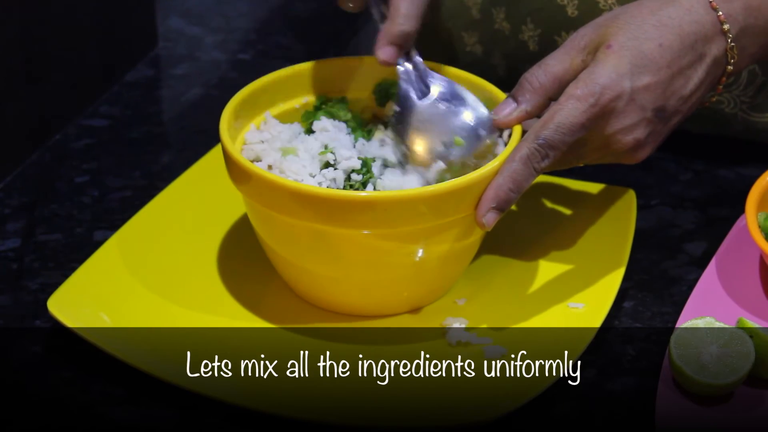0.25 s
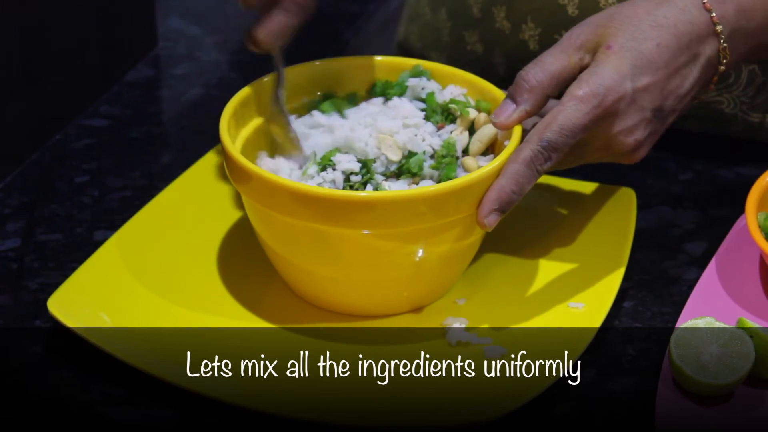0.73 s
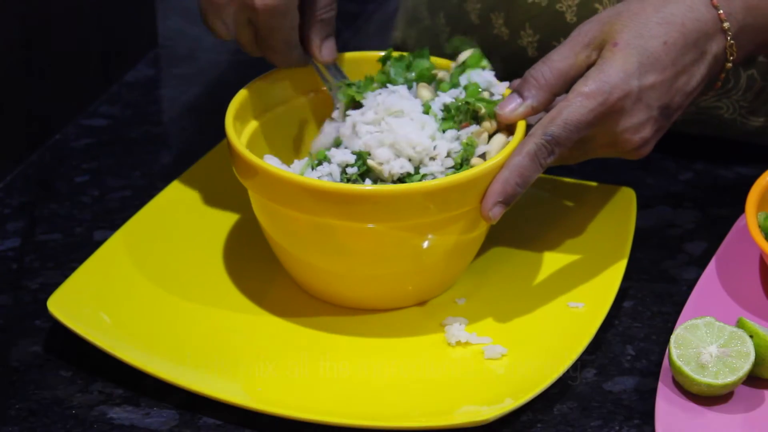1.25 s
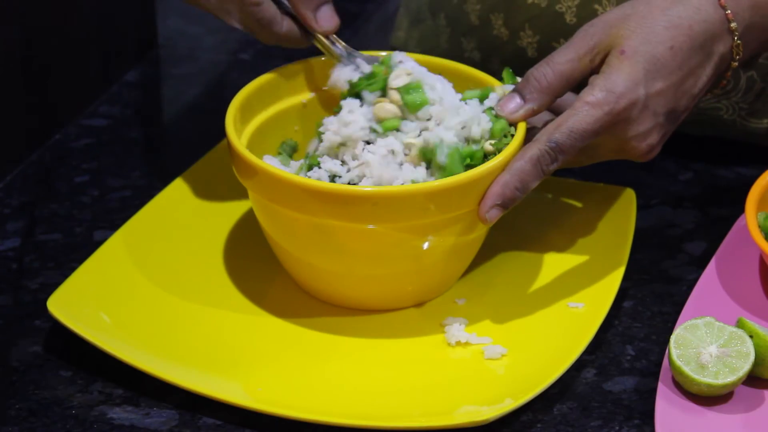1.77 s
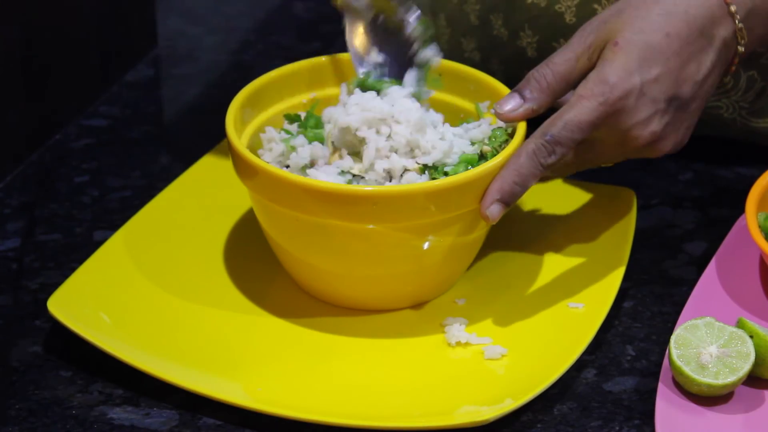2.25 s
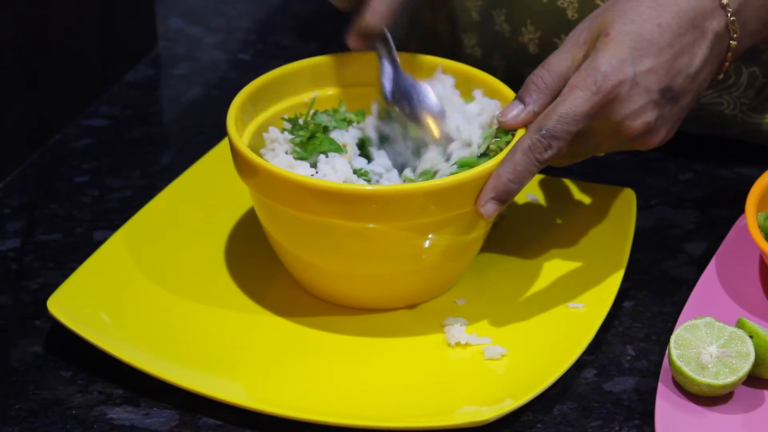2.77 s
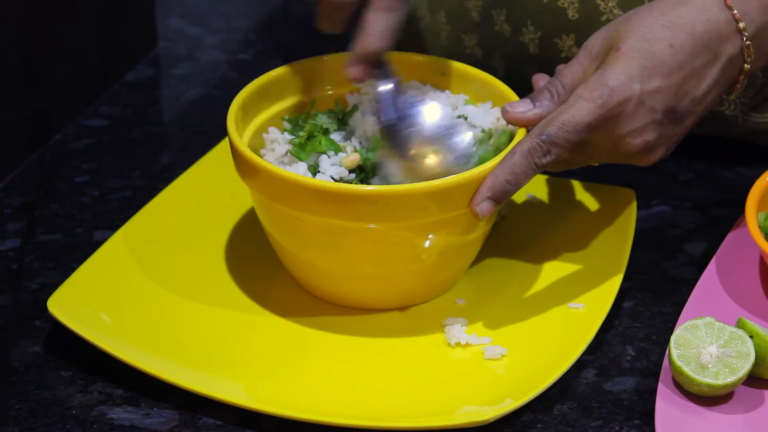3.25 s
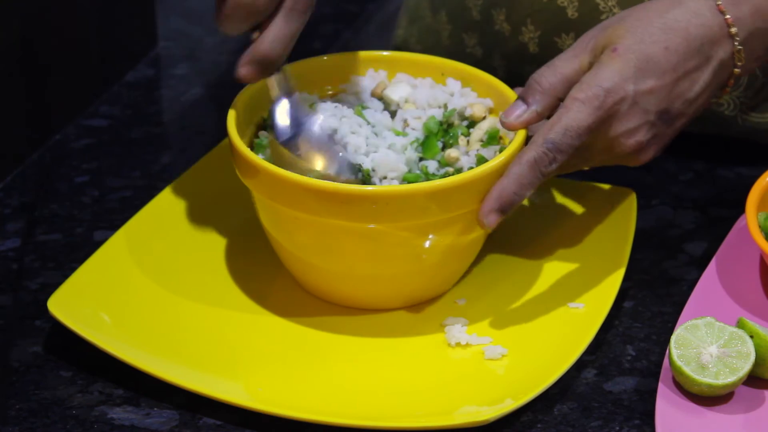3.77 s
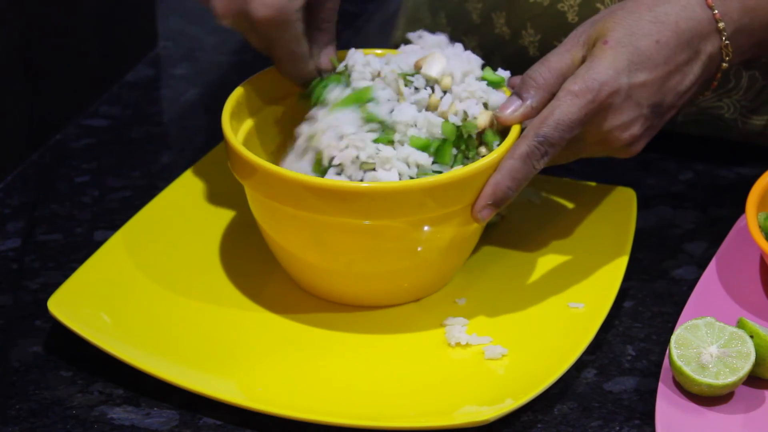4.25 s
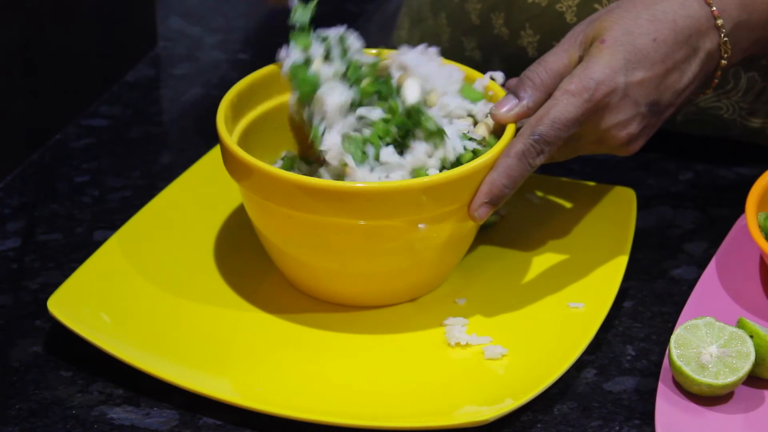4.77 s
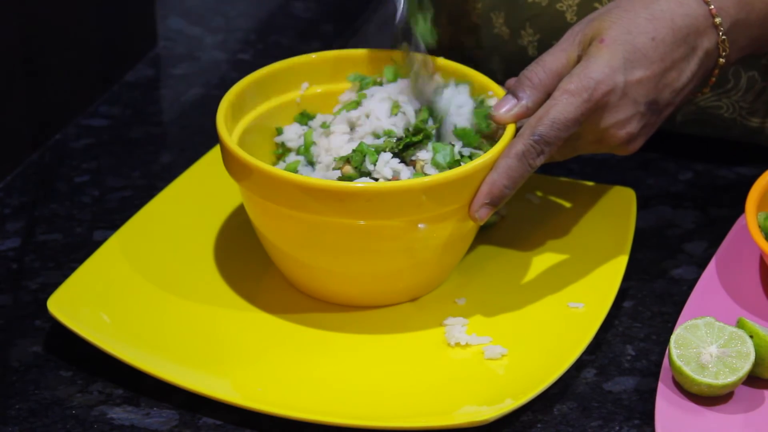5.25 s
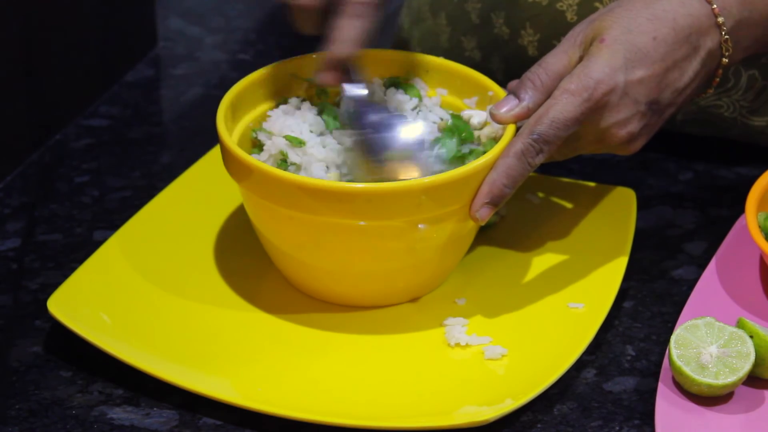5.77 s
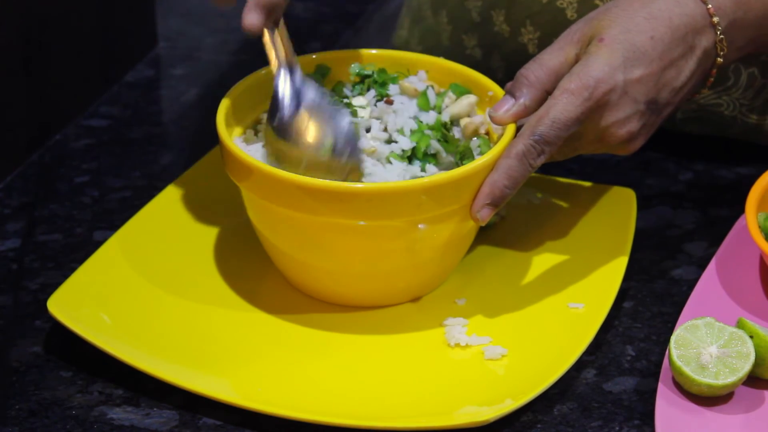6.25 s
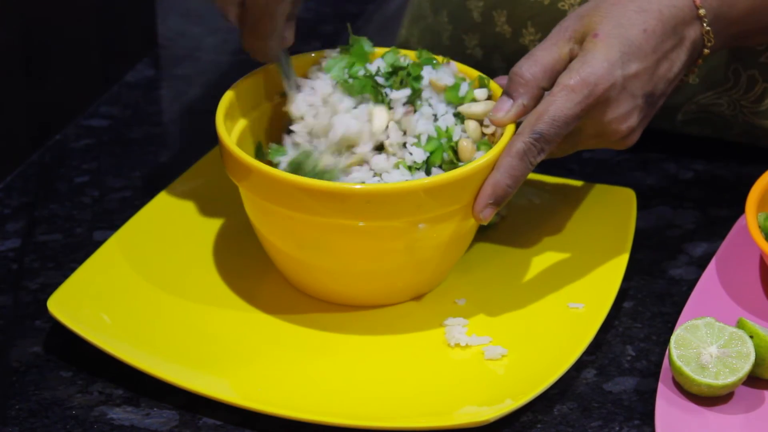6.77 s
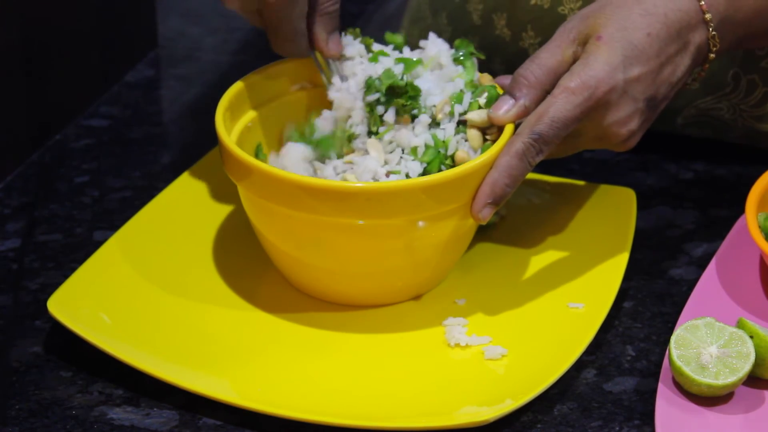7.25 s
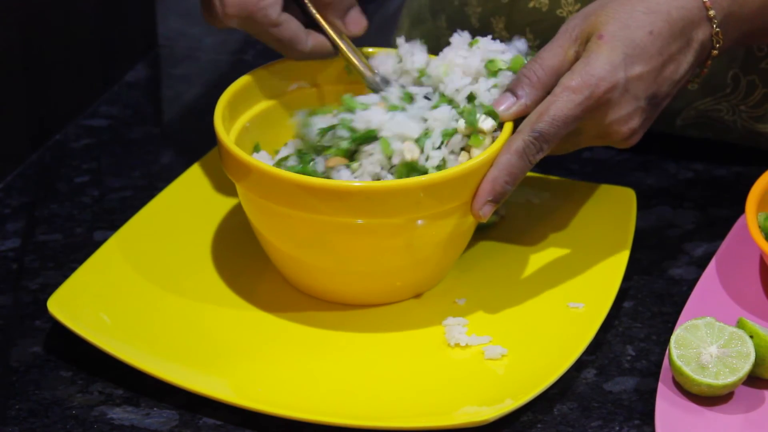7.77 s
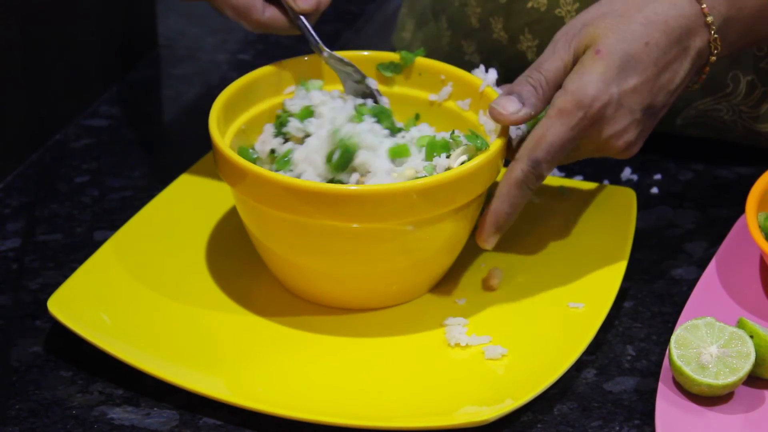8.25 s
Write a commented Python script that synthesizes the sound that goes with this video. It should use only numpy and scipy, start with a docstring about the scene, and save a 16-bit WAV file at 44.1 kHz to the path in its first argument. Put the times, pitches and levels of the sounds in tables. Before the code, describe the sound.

A metal spoon stirs rice and nuts in a plastic bowl, with gritty scrapes, bright ticks, hollow knocks and soft rustling tumbles in a quiet kitchen.

```python
"""Mixing rice with a steel spoon

A steel spoon mixes cooked rice, herbs and nuts in a plastic bowl that stands on a plate, in a quiet kitchen.
It plunges, sweeps and drags: rough friction noise excites resonances. Turned-over loads rustle as filtered noise.
It ticks against the rim and the nuts, knocks the bowl, and the bowl bumps the plate: decaying tones with a
crack of noise and a short answer from the room. Steady noise with faint ticks lies under it all."""
import sys
import numpy as np
from scipy import signal
from scipy.fft import rfft, irfft, next_fast_len
from scipy.io import wavfile

SR = 44100
rng = np.random.default_rng(int(sys.argv[2]) if len(sys.argv) > 2 else 0)


def unload_wav(signal):
    """Save mono or channel-first audio to the path in sys.argv[1] as 16-bit WAV at rate SR, clipped to [-1, 1]."""
    wavfile.write(
        sys.argv[1],
        SR,
        np.round(np.clip(np.atleast_2d(signal).T, -1, 1) * 32767).astype(np.int16),
    )


N = 375291  # length in samples, about 8.5 s

# the spoon plunges down the wall: [start_s, rise_s, hold_s, fade_t60_s (at fade speed 1), level_db,
# pressure_db (extra level of the bowl register)]
PLUNGES = [(0.118, .028, 0.15, 0.34, -31.5, -4.5), (0.719, 0.041, 0.045, 0.49, -32.5, 0.5)]
# going deeper it drums more on the bowl and rings less; rows are bowl, rice, ring, blade, hiss:
# [level_db, drift_db_per_s (while held), fade_speed (times)]
PLUNGE_REGISTERS = [(-1.5, 61, .9), (-6.5, 11, 1.02), (-0.5, -77, 0.83), (-0.5, -61, 0.99), (-9, -30, 2.5)]
# resonances of the spoon pressed down into the bowl: [pitch_hz, width_hz, level_db (relative)]
PRESSED_SPOON = [(496, 194, -4.5), (643, 85, 4.5), (1046, 200, 1.5), (1835, 380, -1), (2140, 140, -9),
                 (2850, 160, -4), (3926, 210, 0), (4220, 90, 1), (4620, 170, -8), (5850, 430, -12),
                 (6760, 250, -11), (7130, 390, -12.5), (7970, 220, -14), (8970, 420, -16.5),
                 (10200, 570, -16), (12060, 140, -10), (13300, 360, -11.5), (15100, 280, -18),
                 (15600, 200, -38)]


def plunges():
    """The spoon grinds down between rice and wall, then lifts away; friction rings the pressed spoon."""
    roughness = amp(0.9 * wobble(110))
    force = grit(rate=2000, spread_db=0, smooth=1.0) * roughness
    gains = pushes(PLUNGES, PLUNGE_REGISTERS)
    return scrape(force, PRESSED_SPOON, [1500, 3250, 4570, 8760], gains, shifting_db=3.0, rub_db=-41)


# the back of the spoon sweeps across the rice: [start_s, rise_s, hold_s, fade_t60_s (at fade speed 1),
# level_db, pressure_db (extra level of the bowl register)]
SWEEPS = [(3.244, .028, .09, .38, -33, -0.5), (5.738, 0.056, 0.0058, 0.56, -31, 0)]
# rows are bowl, blade, hiss: [level_db, drift_db_per_s (while held), fade_speed (times)]
SWEEP_REGISTERS = [(-2.5, -83, 0.97), (-1, -53, 0.94), (-3, -53, 2.1)]
# resonances of the spoon lying on the rice: [pitch_hz, width_hz, level_db (relative)]
SLIDING_SPOON = [(517, 150, -7), (1158, 185, -2), (1997, 137, 0.5), (2900, 145, 2.5), (3970, 350, 5),
                 (4780, 150, 6.5), (5440, 170, 0.5), (6150, 520, 4), (7250, 180, 5.5), (8900, 320, -6),
                 (10400, 270, -12.5), (12200, 170, -7), (13700, 370, -16), (14800, 250, -18),
                 (15600, 200, -36)]


def sweeps():
    """The spoon's back catches and slips over the grains, which rings the lying spoon."""
    roughness = amp(1.2 * wobble(120))
    force = grit(rate=1800, spread_db=-5.0, smooth=0.8) * roughness
    gains = pushes(SWEEPS, SWEEP_REGISTERS)
    return scrape(force, SLIDING_SPOON, [2500, 8700], gains, shifting_db=0.5, rub_db=-47)


# the edge of the spoon drags lightly along the wall: [start_s, rise_s, hold_s, fade_t60_s, level_db,
# centre_hz, focus_db_per_octave]
DRAGS = [(4.055, .02, .02, .3, -41.5, 3100, 13), (4.12, 0.017, .01, 0.091, -38.5, 6500, 4.5),
         (4.155, 0.019, .005, 0.085, -41.5, 6500, 0.5), (4.203, 0.016, .14, 0.16, -24.5, 5070, 18),
         (4.25, 0.0071, 0.13, 0.23, -38, 2200, 31), (4.393, .01, 0.19, 0.22, -33, 4100, 48),
         (6.519, .02, 0.04, 0.19, -55.5, 6500, 1), (6.785, .02, .003, 0.11, -51, 6000, 7),
         (7.135, .02, .003, 0.13, -58, 6500, 8), (8.064, 0.0082, 0.0039, .24, -28.5, 6500, 16)]
# rows are wall, ring, hiss, fizz: [pitch_hz, level_db]
DRAG_REGISTERS = [(2200, 0.5), (4100, -4.5), (6500, -4.5), (11500, -7)]


def drags():
    """A light touch lets the steel ring at its own modes, broadened by the contact."""
    peaks = [(hz, 0.067 * hz, db) for hz, db, t60 in SPOON_MODES]
    # the wall of the bowl joins in with one broad resonance
    peaks.append((1960, 280, -7.0))
    force = grit(rate=2500, spread_db=1.5, smooth=1.0)
    gains = 0
    for start, rise, hold, fade, level_db, centre_hz, focus in DRAGS:
        register_gains = amp(voiced(level_db, centre_hz, focus, DRAG_REGISTERS))
        # the hand eases off
        movement = stroke(start, rise, hold, fade, drift_db_per_s=-90)
        gains = gains + np.outer(register_gains, movement)
    return scrape(force, peaks, [3400, 5000, 9300], gains, shifting_db=4.0, rub_db=-41)


# a spoonful is turned over and slides down: [start_s, rise_s, slide_s, fade_t60_s (before extra fading of
# the low end), rustle_db, clumps_db, bowl_db, brightness_db, dulling_db_per_s];
# each treble band takes its own share of brightness and dulling
TUMBLES = [(2.315, .01, 0.1, 0.069, -25, -1, -49, -7.5, 50),
           (2.435, 0.02, 0.17, 0.44, -27.5, 1, -82, 2.5, 40),
           (4.632, 0.025, 0.17, 0.45, -26, 2, -29, 2.5, 114),
           (8.196, 0.043, 0.27, .4, -25.5, 3.5, -54, 5, 45)]
# colour of the sliding rice: [pitch_hz, level_db (relative, per Hz)]
RICE_COLOUR = [(200, -60), (720, -65), (850, -14.5), (1100, -4), (1800, 1.5), (3000, 2.5), (4400, -3.5),
               (5300, -7), (7000, -13), (9000, -21), (11000, -34), (13000, -39), (15500, -49)]


def tumbles():
    """Countless grains slide: brighter and fuller while they move fast, and drumming where they meet the bowl."""
    rough = grit(rate=3500, spread_db=2, smooth=1.0)
    grains = unit(filtered(rough, lambda f: amp(along(RICE_COLOUR, f))))
    heavy, *light = split(grains, [1450, 3700, 6100, 8800])

    patter = grit(rate=1500, spread_db=1.5, smooth=0.8)
    # the bowl's decay times turned into widths
    bowl_peaks = [(hz, 3.4 / t60, db) for hz, db, t60 in BOWL_MODES]
    ringing = unit(resonate(patter, bowl_peaks, shifting_db=0.5))
    thud_peaks = [(280, 25, 11), (484, 2100, -21.0), (900, 330, 5.5), (1722, 19, 14)]
    thudding = unit(resonate(patter, thud_peaks, shifting_db=4.5))
    drumming = amp(2.0) * ringing + amp(-3.0) * thudding

    out = np.zeros(N)
    for start, rise, slide, fade, rustle_db, clumps_db, bowl_db, bright_db, dulling in TUMBLES:
        # ever fewer grains move, and fewer still reach the bowl
        flow = amp(rustle_db) * stroke(start, rise, slide, fade, drift_db_per_s=-52.5)
        drum_gain = amp(bowl_db) * stroke(start, rise, slide, fade, drift_db_per_s=-55)
        # heavy clumps land first, so the low end dies before the rest
        clump_gain = amp(clumps_db) * np.minimum(flow / amp(-24.5), 1) ** 0.77
        rustle = clump_gain * heavy
        # the higher the band, the more it fades as the grains slow down
        sliding_s = np.clip(np.arange(N) / SR - start, 0, slide)
        treble_db = bright_db - dulling * sliding_s
        for share, band in zip([0, .55, 1, 1.45], light):
            rustle += amp(share * treble_db) * band
        out += flow * rustle + drum_gain * drumming
    return out


# hard contacts of the spoon: [start_s, level_db, centre_hz, focus_db_per_octave]
TAPS = [(0.1401, -26.5, 4100, 10.5), (0.4081, -42, 5300, 25), (0.464, -52, 2680, 3.5),
        (0.5818, -56.5, 5950, 32), (1.0067, -50, 7250, 6), (1.3346, -27, 4080, 13.5),
        (1.483, -30, 4800, 26), (1.7395, -32.5, 4300, 46), (1.7697, -38, 3970, 53), (2.0832, -57, 6000, 24),
        (2.3288, -26, 2880, 10), (2.3868, -24.5, 2700, 6.5), (2.3958, -17, 3300, 22.5),
        (2.4921, -24.5, 2700, 5), (2.5044, -29, 2700, 5), (2.5488, -21.5, 3210, 21), (3.221, -40, 3860, 38),
        (3.2419, -42, 2570, 5), (3.3589, -28, 7900, 14), (3.4158, -33.5, 3860, 14),
        (3.5251, -32.5, 4760, 27), (4.2183, -29, 6330, 12), (4.2604, -27.5, 2700, 10),
        (4.3824, -17.5, 4060, 31), (4.5212, -25, 4590, 43), (5.2341, -42, 3700, 12.5), (5.78, -29, 6800, 9),
        (5.8, -45, 7000, -2), (5.9799, -25, 3930, 29.5), (6.5044, -35.5, 3810, 46), (6.5689, -38, 3880, 45),
        (6.9523, -25, 3930, 61), (7.3428, -56.5, 5500, 5), (8.0398, -35.5, 3070, 7),
        (8.2914, -24.5, 2700, 7), (8.3839, -24.5, 4870, 20)]
# rows are body, ring, ping, crack: [pitch_hz, level_db]
TAP_REGISTERS = [(2700, 0.6), (4100, -3.3), (6000, 1.3), (11000, -10.5)]
# tones of the free spoon, also used by the drags: [pitch_hz, level_db (relative), t60_s]
SPOON_MODES = [(1820, -12, 0.0097), (2370, -13, 0.0093), (2994, -9, 0.027), (3960, 7, 0.03),
               (4200, 3.5, 0.015), (4496, -6.5, 0.05), (5530, -8, 0.033), (5844, -7, 0.016),
               (7110, -9, 0.012), (7850, -16, 0.025), (9940, -25, 0.009), (11900, -33.5, 0.009),
               (13600, -47, .02)]


def taps():
    """The spoon ticks against the rim and the nuts, and its steel rings very briefly."""
    return strikes(contacts(TAPS, TAP_REGISTERS), SPOON_MODES, [3400, 4500, 9000],
                   crack_db=-7, crack_t60=0.018, attack=0.00068, room_db=-11.5)


# blows on the bowl: [start_s, level_db, centre_hz, focus_db_per_octave]
KNOCKS = [(0.2013, -24, 1820, 5), (1.2247, -27, 2150, 6), (2.3039, -34.5, 480, 12),
          (3.7763, -41.5, 1810, 10.5), (4.0173, -26.5, 1700, 6), (4.0233, -29.5, 1390, 8),
          (4.0415, -31, 2200, 10), (6.0466, -43.5, 4000, 3.5), (6.3489, -43, 1960, 11),
          (7.5172, -19, 900, 14.5), (7.5225, -30, 680, 11), (7.9373, -49, 2180, 11),
          (7.9693, -32, 3250, 14)]
# rows are base, lower wall, upper wall, rim, click: [pitch_hz, level_db]
KNOCK_REGISTERS = [(450, 0.5), (780, -6.5), (1150, -6), (2000, 1), (4000, -3.5)]
# tones of the bowl on its plate, also used by the tumbles: [pitch_hz, level_db (relative), t60_s]
BOWL_MODES = [(293, -23, 0.082), (376, -9, 0.06), (491, 2, 0.087), (679, -3, 0.083), (738, -3, 0.085),
              (802, -3, 0.075), (935, -7.5, 0.028), (1127, 1.5, 0.046), (1470, -0.5, 0.09),
              (1740, 9.5, 0.037), (1930, 5, 0.054), (2097, 2.5, 0.054), (2285, -2.5, 0.11),
              (2654, 1.5, 0.066), (2740, -1, 0.036), (3260, -5.5, 0.043), (3810, -11, 0.037),
              (5640, -26, 0.053)]


def knocks():
    """Blows of the spoon set the plastic bowl ringing at its own modes."""
    return strikes(contacts(KNOCKS, KNOCK_REGISTERS), BOWL_MODES, [580, 970, 1350, 3070],
                   crack_db=1.0, crack_t60=0.036, attack=0.00093, room_db=-10.5)


# the bowl rocks on the plate and bumps it: [start_s, low_db, hollow_db]
BUMPS = [(2.316, -76, -43), (2.358, -68, -41), (4.030, -45, -42), (4.055, -42, -39), (4.078, -54, -65)]
# tones of the plate on the counter: [pitch_hz, level_db (relative), t60_s]
PLATE_MODES = [(108, 0, 0.1), (163, -9, 0.06), (200, 9.5, 0.06), (248, 3, 0.059), (278, 4.5, 0.088),
               (430, -3, 0.062), (553, 2, 0.08)]


def bumps():
    """The rocking bowl excites the low modes of the plate, split at 350 Hz into low and hollow."""
    return strikes(BUMPS, PLATE_MODES, [350],
                   crack_db=-12, crack_t60=0.034, attack=0.0018, room_db=-14.0)


# how long the room's answer lasts: [pitch_hz, t60_s]
KITCHEN_DECAY = [(200, 0.35), (800, 0.38), (2000, 0.36), (4000, 0.25), (8000, 0.23), (15000, 0.14)]


def kitchen(x):
    """The room's answer to a short sound: a diffuse tail that dies faster in the treble."""
    hz, t, z = signal.stft(rng.standard_normal(len(x)), SR, nperseg=256)
    fading = amp(-60 * t / along(KITCHEN_DECAY, hz)[:, None])
    tail = signal.istft(z * fading, SR, nperseg=256)[1]
    tail[:int(.004 * SR)] = 0  # the answer starts after 4 ms
    return signal.fftconvolve(x, tail / np.linalg.norm(tail))[:len(x)]


# colour of the room noise: [pitch_hz, level_db (relative, per Hz)]
AIR_COLOUR = [(15, -85), (25, -52), (59, -20.5), (123, -6.5), (189, -2.5), (248, -3), (276, -1), (449, -2),
              (834, -2.5), (1180, -6), (1360, -5), (2590, -9.5), (3300, -10), (4570, -15), (15800, -31.5)]
# shared level of noise and ticks, before their own mix gains and a small wobble: [time_s, level_db]
AIR_LEVEL = [(0, -52), (.6, -50), (1.1, -50.5), (1.5, -50), (2.0, -55), (2.25, -55.5), (2.8, -51.5),
             (3.2, -53), (3.7, -51), (5.1, -51.5), (5.7, -52), (6.2, -51), (7.2, -51.5), (7.47, -54.5),
             (7.8, -52), (8.51, -53.5)]


def room_noise():
    """The steady rush of the kitchen is filtered noise; sparse resonant ticks are sticky rice settling."""
    level = amp(curves(AIR_LEVEL)[0] + 0.7 * wobble(8))
    air = unit(filtered(rng.standard_normal(N), lambda f: amp(along(AIR_COLOUR, f))))
    ticks = grit(rate=18, spread_db=3, smooth=0)
    crumbs = unit(resonate(ticks, [(4000, 600, 0), (5800, 700, -6)], shifting_db=2))
    return level * (amp(-4.0) * air + amp(-24.5) * crumbs)


def grit(rate, spread_db, smooth):
    """Friction force: tiny slips of uneven size, rate a second, on a share of smooth rubbing."""
    happens = rng.random(N) < rate / SR
    size = amp(spread_db * np.clip(rng.standard_normal(N), -2, 2))
    slips = happens * rng.standard_normal(N) * size
    return unit(unit(slips) + smooth * rng.standard_normal(N))


def scrape(force, peaks, edges_hz, gains, shifting_db, rub_db):
    """Friction rings the resonances over a little plain rubbing; each register follows its own gain."""
    rub = filtered(force, lambda f: f ** 2 / (f ** 2 + 400 ** 2))
    sound = resonate(force, peaks, shifting_db) + amp(rub_db) * rub
    registers = split(sound, edges_hz)
    return sum(gain * unit(part) for gain, part in zip(gains, registers))


def resonate(x, peaks, shifting_db):
    """x through steep (Hz, width, dB) resonances; each swells and fades as the contact point moves."""
    out = np.zeros(N)
    for hz, width, db in peaks:
        # filtering twice narrows the peak, so each pass is 1.5 times as wide
        b, a = signal.iirpeak(hz, hz / (1.5 * width), SR)
        ringing = signal.lfilter(b, a, signal.lfilter(b, a, x))
        out += ringing * amp(db + shifting_db * wobble(22))
    return out


def strikes(rows, modes, edges_hz, crack_db, crack_t60, attack, room_db):
    """Each contact rings the modes at new strengths, with a short crack; levels are set over its first 8 ms."""
    out, t = np.zeros(N + SR), np.arange(SR // 3) / SR
    head = int(.008 * SR)
    hz, level, t60 = np.transpose(modes)[:, :, None]
    register = np.searchsorted(edges_hz, hz[:, 0])
    # the object radiates little below its lowest mode or above its highest
    band_hz = [.7 * hz.min(), min(1.3 * hz.max(), .45 * SR)]
    radiation = signal.butter(3, band_hz, "band", fs=SR, output="sos")
    colour = [mode[:2] for mode in modes]
    noise = signal.sosfilt(radiation, rng.standard_normal(N + SR))
    hiss = split(filtered(noise, lambda f: amp(along(colour, f))), edges_hz)
    for s, *levels in rows:
        start = round(s * SR)
        # grip and contact point change the strength and tuning of each mode
        size, detune, phase = rng.standard_normal((3, len(modes), 1))
        tones = np.sin(2 * np.pi * (hz * (1 + 0.012 * detune) * t + phase))
        rings = amp(level + 4 * size - 60 * t / t60) * tones
        hit = np.zeros(len(t))
        for k, db in enumerate(levels):
            crack = hiss[k, start:start + len(t)] * amp(-60 * t / crack_t60)
            ring = rings[register == k].sum(axis=0)
            part = ring / (np.std(ring[:head]) + 1e-9)
            part += amp(crack_db) * crack / np.std(crack[:head])
            part *= 1 - np.exp(-(t / attack) ** 2)  # soft onset
            hit += amp(db) * part / np.std(part[:head])
        hit = signal.sosfilt(radiation, hit)
        out[start:start + len(t)] += hit + amp(room_db) * kitchen(hit)
    return out[:N]


def stroke(start, rise, hold, fade_t60, drift_db_per_s):
    """Gain of one movement: it speeds up, drifts in level while it lasts, then dies away."""
    t = np.arange(N) / SR - start
    held = np.clip(t - rise, 0, hold)
    after = np.maximum(t - rise - hold, 0)
    return np.clip(t / rise, 0, 1) * amp(drift_db_per_s * held - 60 * after / fade_t60)


def pushes(rows, registers):
    """Gain of each register over all strokes; pressure feeds the lowest, and each fades at its own speed."""
    gains = []
    for k, (register_db, drift, speed) in enumerate(registers):
        gain = np.zeros(N)
        for start, rise, hold, fade, level_db, pressure_db in rows:
            db = level_db + register_db + (pressure_db if k == 0 else 0)
            gain += amp(db) * stroke(start, rise, hold, fade / speed, drift)
        gains.append(gain)
    return gains


def voiced(level_db, centre_hz, focus, registers):
    """dB in each register: the contact favours one pitch and loses focus dB per octave away from it."""
    return [level_db + db - focus * abs(np.log2(hz / centre_hz)) for hz, db in registers]


def contacts(rows, registers):
    """The time of each contact and its dB in each register."""
    return [(s, *voiced(db, hz, focus, registers)) for s, db, hz, focus in rows]


def amp(db):
    """Decibels to gain."""
    return 10 ** (np.asarray(db) / 20)


def unit(x):
    """x at an average strength (rms) of 1."""
    return x / np.sqrt(np.mean(x ** 2) + 1e-20)


def along(points, hz):
    """(Hz, value) points read on a log axis."""
    f, v = np.transpose(points)
    return np.interp(np.log(hz + 1), np.log(f + 1), v)


def curves(rows):
    """One value per sample for each column after the time."""
    s, *cols = np.transpose(rows)
    return [np.interp(np.arange(N) / SR, s, c) for c in cols]


def wobble(rate):
    """A random curve of straight lines between knots, rate knots a second."""
    knots = rng.standard_normal(int(N * rate / SR) + 2)
    return np.interp(np.arange(N, dtype=float), np.arange(len(knots)) * SR / rate, knots)


def filtered(x, response):
    """x with each frequency multiplied by response(frequency)."""
    m = next_fast_len(len(x) + 8192)  # spare room so the end does not wrap onto the start
    return irfft(rfft(x, m) * response(np.fft.rfftfreq(m, 1 / SR)), m)[:len(x)]


def split(x, edges_hz):
    """x cut into neighbouring bands that add up to x."""
    below = [filtered(x, lambda f: 1 / (1 + (f / edge) ** 16)) for edge in edges_hz]
    return np.diff([np.zeros_like(x), *below, x], axis=0)


def scene():
    """All sounds added into one channel."""
    spoon_in_rice = plunges() + sweeps() + drags() + tumbles()
    hits = taps() + knocks() + bumps()
    return (spoon_in_rice + hits + room_noise())[None]


def record(dry):
    """Keep only the frequencies below a sharp upper limit."""
    top_hz = 15830
    return np.array([filtered(channel, lambda hz: hz < top_hz) for channel in dry])


dry = scene()
out = record(dry)
unload_wav(out)
```